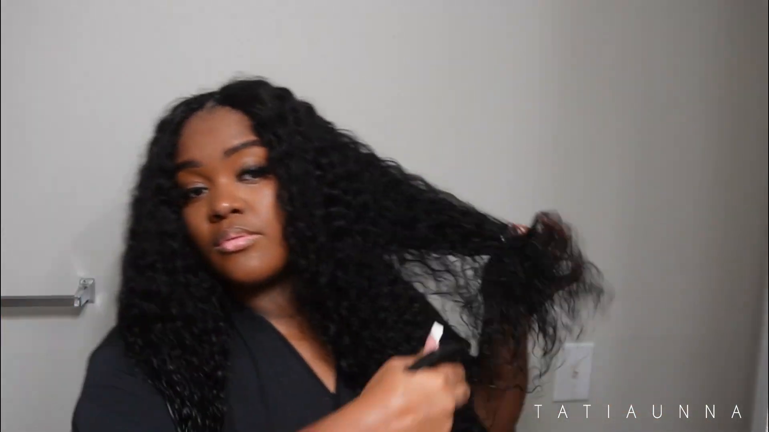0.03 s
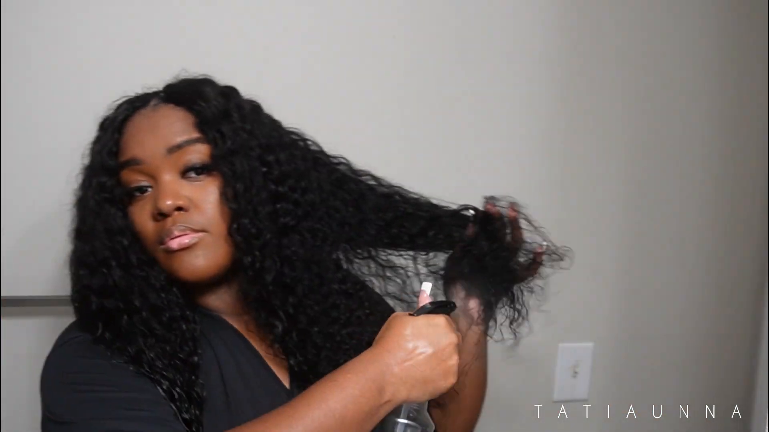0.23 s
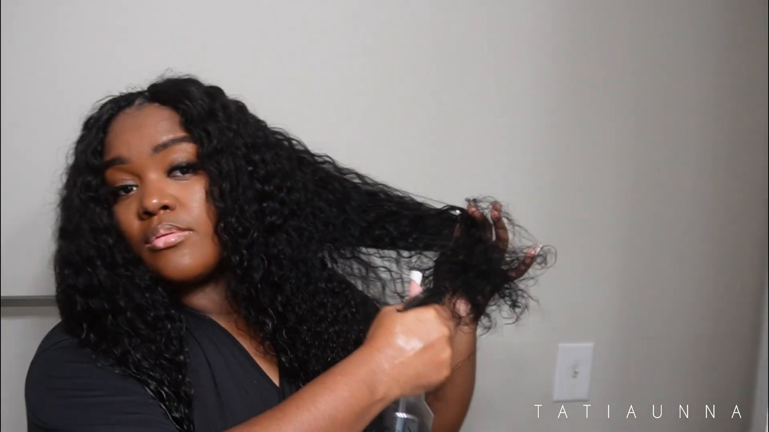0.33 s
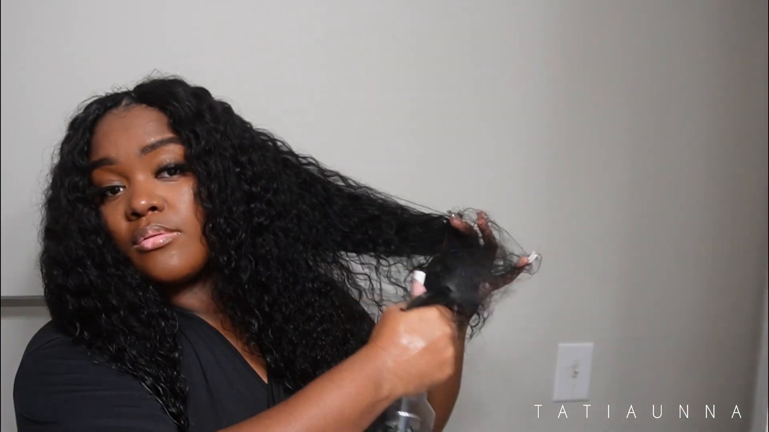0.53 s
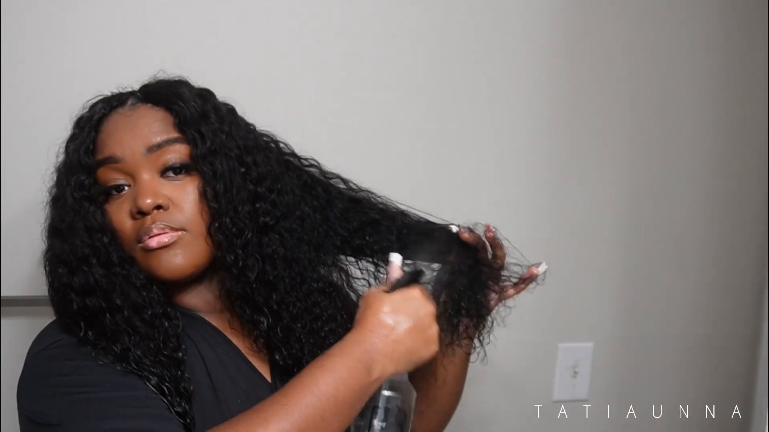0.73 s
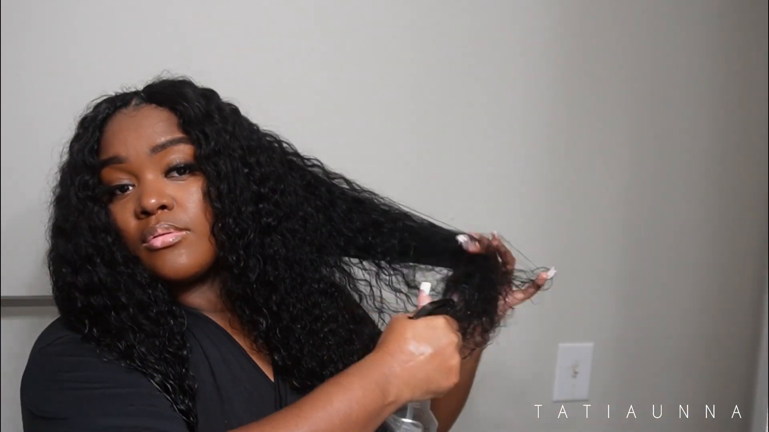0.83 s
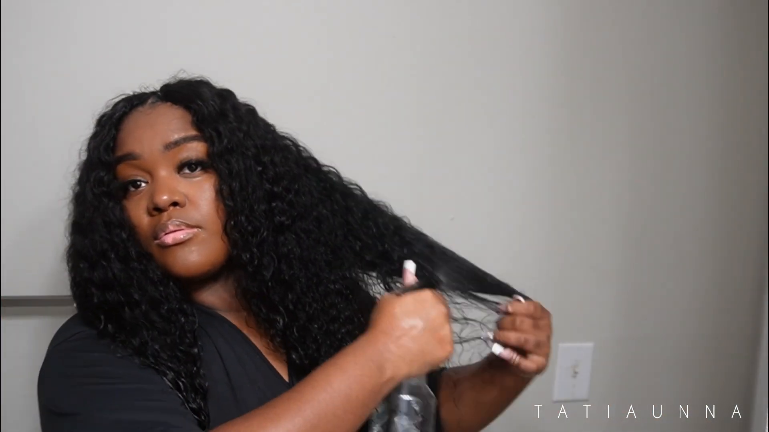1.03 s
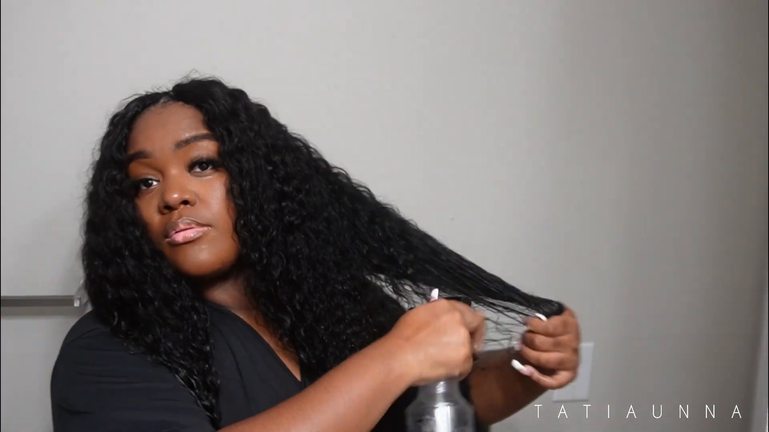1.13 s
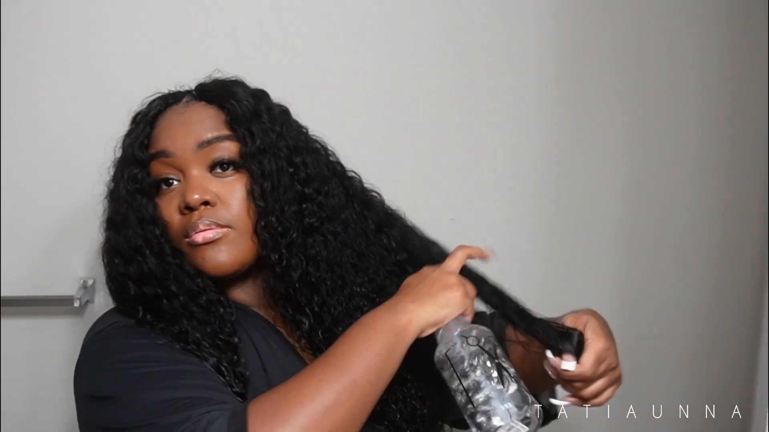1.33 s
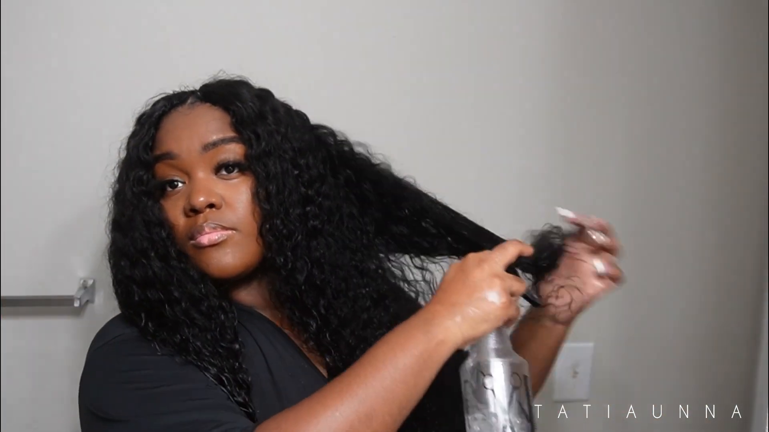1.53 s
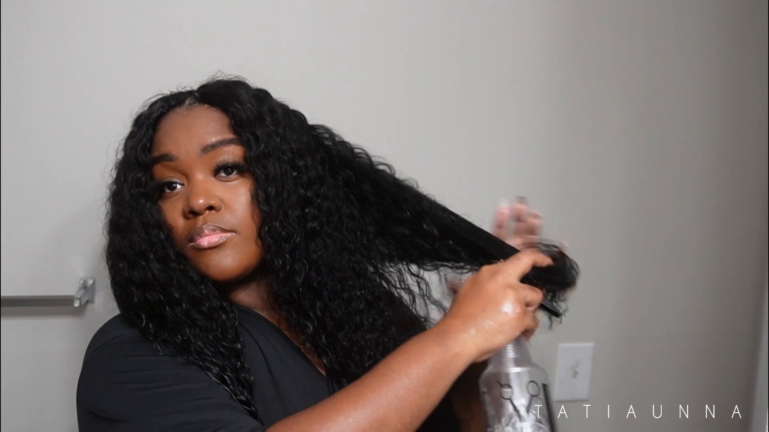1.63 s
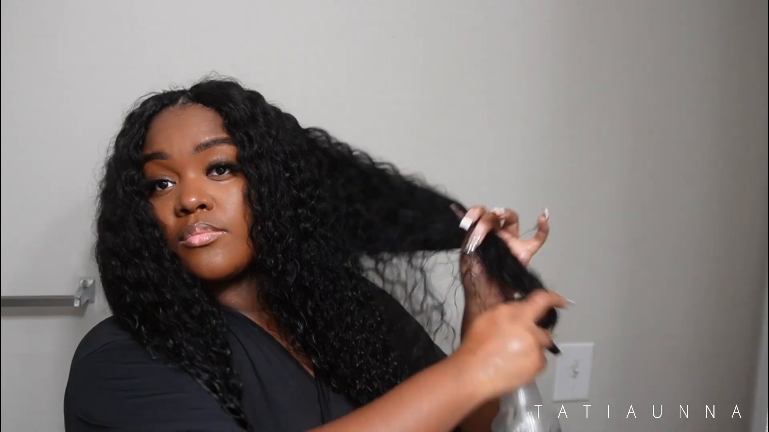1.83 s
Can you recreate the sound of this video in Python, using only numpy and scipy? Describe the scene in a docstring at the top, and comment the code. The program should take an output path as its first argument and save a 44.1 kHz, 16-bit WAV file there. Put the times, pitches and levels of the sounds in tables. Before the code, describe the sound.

A trigger spray bottle mists four times close by, at about 0.3, 0.55, 0.8 and 1.05 seconds, the first softer. Each squeeze clicks, hisses and sucks back faintly, while water knocks in the bottle. From 1.4 to 1.9 seconds fingers rake wet hair with a quiet crackle, with a sharp plastic click at 1.6. A low hum and soft fan continue throughout in the small, hard-walled room.

```python
"""In a small, hard-walled room, over mains hum and a soft fan, fingers brush long curly hair.
A trigger bottle then sprays it with water four times: each squeeze clicks, swells into a hiss
and lets the pump suck back, while water knocks about in the bottle.
Last, the hands shift their grip and rake the wet hair, which crackles between the fingers."""
import sys
import numpy as np
from scipy import signal
from scipy.fft import rfft, irfft
from scipy.io import wavfile
from scipy.ndimage import uniform_filter1d

SR = 44100
rng = np.random.default_rng(int(sys.argv[2]) if len(sys.argv) > 2 else 0)


def wrap_up_sound(samples):
    """Save the sound to the file named by the first command line argument, as 16-bit audio."""
    columns = np.atleast_2d(samples).T
    # keep every value between -1 and 1, then stretch to whole-number steps
    tamed = np.clip(columns, -1, 1)
    steps = np.round(tamed * 32767).astype(np.int16)
    wavfile.write(sys.argv[1], SR, steps)


N = 83790

# The bright hiss of the mist. Each row: frequency in Hz, relative level in dB.
MIST_SPECTRUM = [(120, -33), (190, -28), (280, -16), (550, -13.5), (750, -12), (1200, -7), (1750, -3.5),
                 (2450, -5.5), (3700, -1.45), (5200, -6.5), (7400, -9), (9400, -13.5), (12800, -15.5),
                 (15500, -18.5)]
# Resonances of bottle and nozzle. Each row: pitch in Hz, width in Hz, gain in dB.
NOZZLE_RESONANCES = [(743, 9.6, 12), (1820, 65, -10), (3050, 80, -11), (3910, 90, -25), (4000, 59, -4),
                     (4990, 27, -14)]
# Four squeezes of the trigger. Each row: valve opening in seconds, hardest push in seconds, level in dB,
# rise and fall in seconds, tilt in dB per octave, level of the first spit in dB.
SQUEEZES = [(0.2, 0.295, -22.5, 0.038, 0.038, 0.2, -42), (0.475, 0.554, -18, 0.032, 0.034, 1.67, -30),
            (.738, 0.809, -18.5, 0.025, 0.036, 0.9, -34.5), (0.983, 1.064, -18.5, 0.032, 0.026, 0.14, -38)]

def spray(t, opens, peak, db, rise, fall, tilt, spit_db):
    """The valve opens with a spit; then mist hisses from the nozzle as hard as the trigger is pushed."""
    drops = patter(per_s=13000, share=0.3)
    jet = drops + sum(undb(gain) * ring(drops, hz, width) for hz, width, gain in NOZZLE_RESONANCES)
    valve = np.clip((t - opens) / 0.0089, 0, 1)
    flow = valve * swell(t - peak, rise, fall)
    flutter_db = 0.8 * waver(per_s=120)
    mist = undb(db + flutter_db) * flow * colour(jet, MIST_SPECTRUM, tilt)
    spit = colour(rng.standard_normal(N), MIST_SPECTRUM, tilt_db=8)
    return mist + undb(spit_db) * strike(t - opens, attack_s=0.0005, decay_s=0.01) * spit


# The pump's midrange fizz. Each row: frequency in Hz, relative level in dB.
REFILL_SPECTRUM = [(200, -11), (450, -1.5), (800, -1), (1500, -0.5), (2400, -3), (3700, -3), (6500, -9),
                   (10000, -25.5), (15500, -37)]
# One suck after each squeeze. Each row: peak in seconds, level in dB, rise and fall in seconds,
# tilt in dB per octave.
REFILLS = [(.412, -34.5, 0.019, 0.03, 1.8), (.665, -34.5, 0.017, 0.03, .3), (.908, -26.5, 0.012, 0.033, 1),
           (1.185, -41, 0.036, .04, 2.2)]

def pump(t):
    """The trigger springs back and draws water up with a fizz."""
    fizz = patter(per_s=2000, share=0.39) * undb(0.93 * waver(per_s=91.9))
    return sum(undb(db) * swell(t - at, rise, fall) * colour(fizz, REFILL_SPECTRUM, tilt)
               for at, db, rise, fall, tilt in REFILLS)


# The hard edge of a click. Each row: frequency in Hz, relative level in dB.
CRACK_SPECTRUM = [(300, -9), (1200, 10.5), (4000, -2.5), (9000, -13), (15500, -37)]
# Snaps of trigger, nails and bottle. Each row: start in seconds, level in dB, ring pitch in Hz,
# ring width (times 1.4 gives Hz), decay in seconds, crack against ring in dB.
CLICKS = [(.201, -24.5, 1190, 450, 0.0042, -4.5), (0.206, -31.5, 1070, 402, 0.054, -5),
          (0.479, -35, 3000, 2500, .004, 7.5), (0.739, -36, 4000, 3000, .005, 3),
          (0.909, -34, 1210, 410, 0.0049, -17), (.955, -29, 3080, 500, 0.0072, -16),
          (0.994, -34, 8300, 450, 0.0061, 5), (1.408, -51, 6640, 593, 0.037, -14),
          (1.424, -42.5, 8000, 700, 0.0072, -22), (1.470, -38, 4130, 1200, 0.019, -8),
          (1.604, -23.5, 3660, 440, 0.0079, -18), (1.831, -47.5, 3600, 1180, 0.013, -7)]

def clicks(t):
    """Plastic snaps: a broad crack and a short ring."""
    crack = colour(rng.standard_normal(N), CRACK_SPECTRUM)
    snaps = 0
    for at, db, hz, width, decay, crack_db in CLICKS:
        snap = noise_band(hz, 1.4 * width) + undb(crack_db) * crack
        snaps += undb(db) * strike(t - at, attack_s=0.00042, decay_s=decay) * snap
    return snaps


# Knocks of the water. Each row: start in seconds, level in dB, pitch in Hz, decay in seconds.
SLOSHES = [(.24, -50, 273, 0.017), (0.356, -39, 800, 0.013), (0.422, -33.5, 673.7, 0.0098),
           (.48, -39, 304, 0.043), (0.736, -39, 252, 0.022), (.742, -35, 750, 0.012),
           (0.923, -36.5, 600, 0.029), (0.992, -39, 271, .03), (1.175, -34, 655, 0.026),
           (1.199, -41.5, 302, 0.011), (1.227, -42, 704, 0.011), (1.484, -32.5, 354, 0.0085),
           (1.486, -39, 764, 0.012), (1.512, -38.5, 626, 0.021)]

def water(t):
    """Dull gulps of the water in the jolted bottle."""
    return sum(undb(db) * strike(t - at, attack_s=0.0024, decay_s=decay) * noise_band(hz, 0.54 * hz)
               for at, db, hz, decay in SLOSHES)


# The thin rustle of wet hair. Each row: frequency in Hz, relative level in dB.
HAIR_SPECTRUM = [(200, -21), (700, -21), (1400, -1), (2100, -2.5), (2900, -5), (4000, -3.5), (7000, -8.5),
                 (10000, -18.5), (15500, -31)]
# Finger strokes. Each row: peak in seconds, level in dB, rise and fall in seconds, tilt in dB per octave.
STROKES = [(0.01, -50.5, .03, 0.038, -10.5), (1.415, -56.5, 0.03, 0.037, 5),
           (1.478, -43.5, 0.0076, 0.016, 5.5), (1.52, -36.5, 0.016, 0.04, -2.5),
           (1.641, -34.5, 0.024, 0.023, -2), (1.735, -49, 0.018, 0.022, 2.5),
           (1.845, -50.5, 0.014, 0.023, 3)]

def hair(t):
    """Wet strands slip and crackle between the fingers."""
    rustle = 0
    for at, db, rise, fall, tilt in STROKES:
        strands = colour(patter(per_s=2700, share=0.43), HAIR_SPECTRUM, tilt)
        rustle += undb(db) * swell(t - at, rise, fall) * strands
    return rustle


# A short, hard reverb. Each row: band centre in Hz, time to fall 60 dB in seconds,
# echo against direct sound in dB, side against mid in dB.
ROOM_BANDS = [(100, .35, -8.5, -26), (390, 1, 0, -13), (1220, 0.49, 1, -31), (2500, 0.43, -3.5, -10),
              (5000, 0.38, -1.5, -3), (9000, 0.44, -1.5, 0), (15000, 0.34, -4.5, 4.5)]

def room(x, size=20480):
    """Hard walls close by: early echoes and a dense tail, narrow in the bass and wide in the treble."""
    t, hz = np.arange(size) / SR, np.arange(size // 2 + 1) * SR / size
    noise = rfft(rng.standard_normal((2, size))) * undb(curve(ROOM_BANDS, hz, column=2))
    noise[1] *= undb(curve(ROOM_BANDS, hz, column=3))  # the side channel
    early = undb(6) * np.exp(-t / 0.0017)
    centres, decays, _, _ = zip(*ROOM_BANDS)
    mid, side, predelay_s = 0, 0, 0.001
    for t60, weights in zip(decays, np.eye(len(centres))):
        tail = np.exp(-np.log(1000) * t / t60)
        envelope = unit((t > predelay_s) * (early + tail)) / np.sqrt(size)
        crossover = np.interp(np.log(hz + 1), np.log(centres), weights)
        echo = envelope * irfft(noise * crossover, size)
        mid, side = mid + echo[0], side + echo[1]
    echo_gain = undb(curve(ROOM_BANDS, BIN_HZ, column=2))
    direct = irfft(rfft(x) / np.sqrt(1 + echo_gain ** 2), N)  # leave room for the echoes' power
    return stereo(direct + signal.fftconvolve(direct, mid)[:N], signal.fftconvolve(direct, side)[:N])


def mains_hum(t, hz=120.1, db=-40):
    """One low, almost steady tone from the mains."""
    return np.sqrt(2) * np.sin(2 * np.pi * hz * t) * undb(db + 0.05 * waver(per_s=9.6))


# The low bed of moving air. Each row: frequency in Hz, relative level in dB.
FAN_SPECTRUM = [(25, -15), (45, -17), (65, -1.5), (78, 0), (98, 1.5), (125, 1), (165, -10.5), (270, -10.5),
                (450, -19), (750, -21.5), (1200, -22.5), (2500, -26), (6000, -31.5), (15500, -39.5)]
# Its stereo width. Each row: frequency in Hz, side against mid in dB.
FAN_WIDTH = [(30, -28), (65, -47), (125, -32.5), (250, -11.5), (1000, -3), (3000, -5), (8000, -1.5)]

def fan(db=-49):
    """A fan stirs the air: a soft, centred rumble under a faint, wide hiss."""
    mid, side = (colour(rng.standard_normal(N), FAN_SPECTRUM) for _ in range(2))
    side = irfft(rfft(side) * undb(curve(FAN_WIDTH, BIN_HZ)), N)
    return undb(db) * stereo(mid, side)


def undb(db):
    """Decibels to gain."""
    return 10 ** (np.asarray(db) / 20)


def unit(x):
    """Scale to rms 1."""
    return x / np.sqrt(np.mean(x ** 2) + 1e-20)


def stereo(mid, side):
    """Mid and side to left and right."""
    return np.array([mid + side, mid - side])


def curve(table, hz, column=1):
    """One column of a table, read along log frequency."""
    table = np.array(table, float)
    return np.interp(np.log(hz + 1), np.log(table[:, 0]), table[:, column])


BIN_HZ = np.arange(N // 2 + 1) * SR / N

def colour(x, spectrum, tilt_db=0):
    """Equalise a sound with a spectrum, tilted per octave; rms 1."""
    octaves = np.log2(np.maximum(BIN_HZ, spectrum[0][0]))
    gain = undb(curve(spectrum, BIN_HZ) + tilt_db * octaves)
    return unit(irfft(rfft(x) * gain, N))


def ring(x, hz, width_hz):
    """A resonance with gain 1 at its centre."""
    q = max(hz / width_hz, 0.5)
    return signal.lfilter(*signal.iirpeak(hz, q, fs=SR), x)


def noise_band(hz, width_hz):
    """Noise passed twice through a resonance; rms 1."""
    return unit(ring(ring(rng.standard_normal(N), hz, width_hz), hz, width_hz))


def waver(per_s):
    """A smooth random wobble; rms 1."""
    hold = int(SR / per_s)
    steps = rng.standard_normal(N)[np.arange(N) // hold]
    return unit(uniform_filter1d(uniform_filter1d(steps, hold), hold))


def patter(per_s, share):
    """Tiny impacts of random size carry a share of the power; smooth hiss carries the rest."""
    ticks = (rng.random(N) < per_s / SR) * rng.standard_normal(N)
    return np.sqrt(share) * unit(ticks) + np.sqrt(1 - share) * rng.standard_normal(N)


def swell(age, rise_s, fall_s):
    """The push of a hand: grows to its peak at age 0 and eases off."""
    return np.exp(-np.where(age < 0, np.abs(age / rise_s) ** 1.44, np.abs(age / fall_s) ** 1.46) / 2)


def strike(age, attack_s, decay_s):
    """A quick attack and an exponential decay."""
    return np.clip(age / attack_s, 0, 1) * np.exp(-np.maximum(age - attack_s, 0) / decay_s)


def scene():
    """The bottle moves between squeezes, so each one meets its own echoes; hum and fan lie under all."""
    t = np.arange(N) / SR
    mist = sum(room(spray(t, *squeeze)) for squeeze in SQUEEZES)
    bottle = room(pump(t) + clicks(t) + water(t))
    return mist + bottle + room(hair(t)) + mains_hum(t) + fan()


def record(dry, top_hz=15950):
    """A steep low-pass trims the highest treble."""
    return signal.sosfilt(signal.ellip(12, 0.2, 80, top_hz, fs=SR, output="sos"), dry)


dry = scene()
out = record(dry)
wrap_up_sound(out)
```